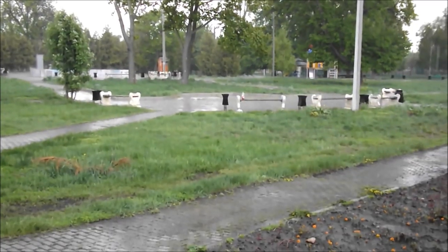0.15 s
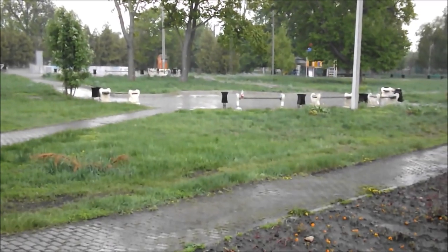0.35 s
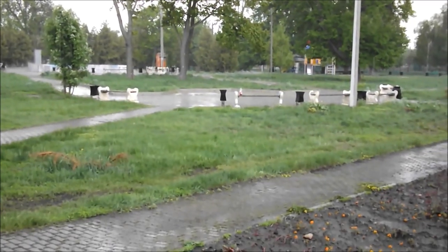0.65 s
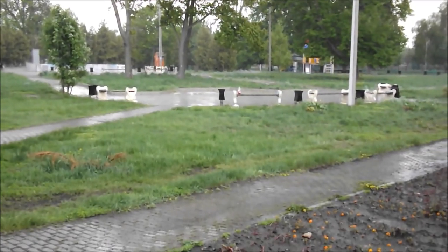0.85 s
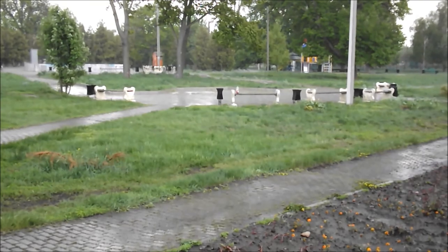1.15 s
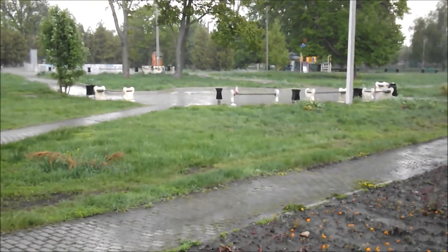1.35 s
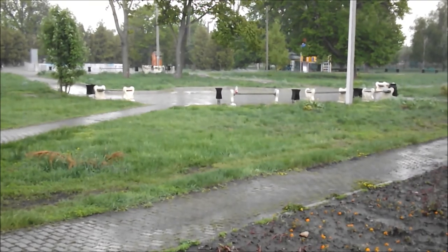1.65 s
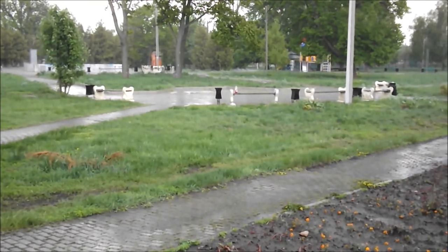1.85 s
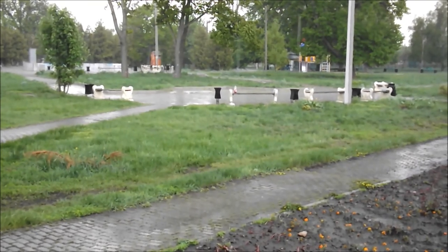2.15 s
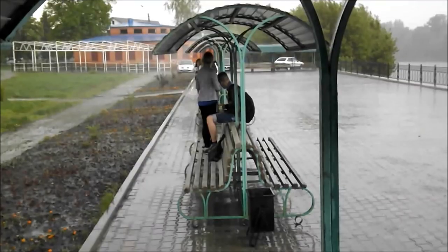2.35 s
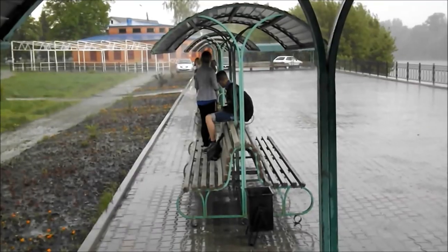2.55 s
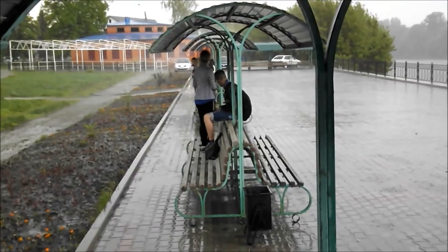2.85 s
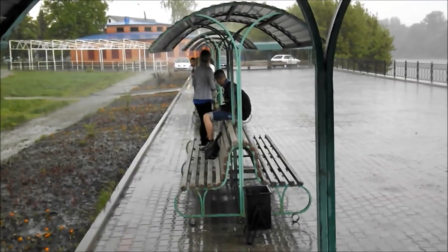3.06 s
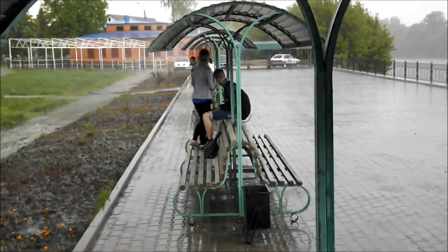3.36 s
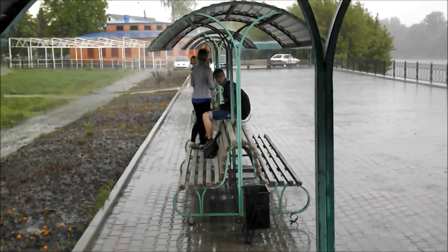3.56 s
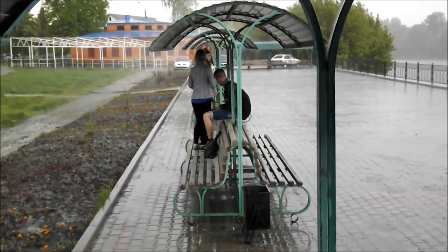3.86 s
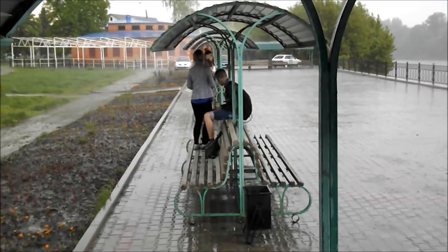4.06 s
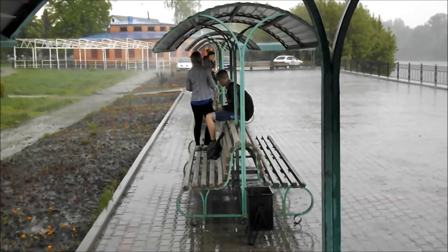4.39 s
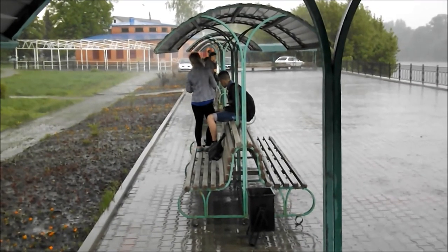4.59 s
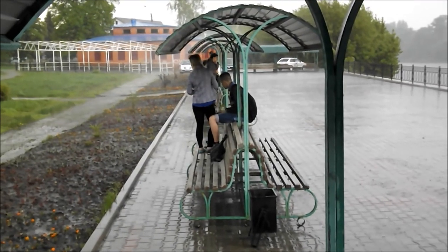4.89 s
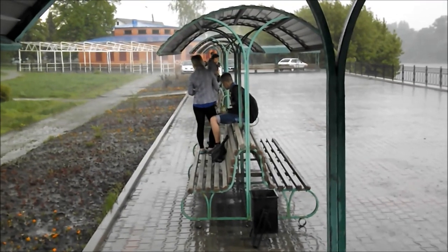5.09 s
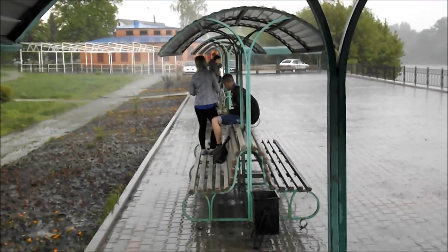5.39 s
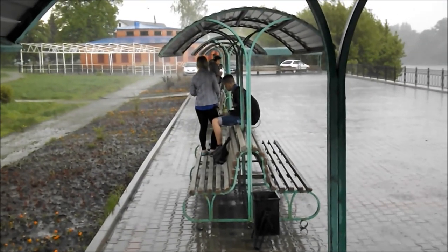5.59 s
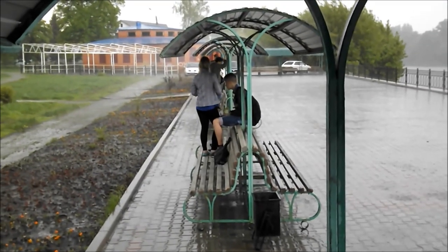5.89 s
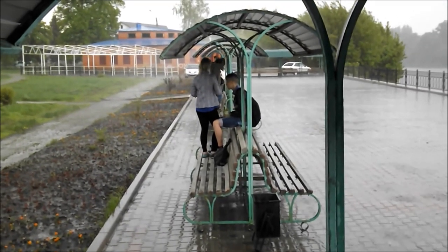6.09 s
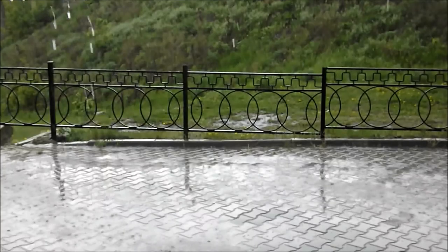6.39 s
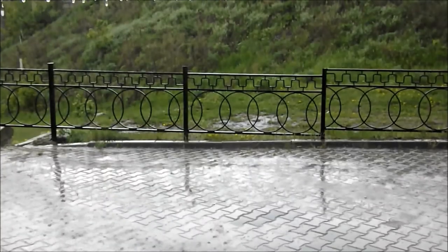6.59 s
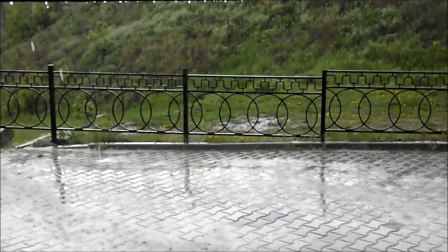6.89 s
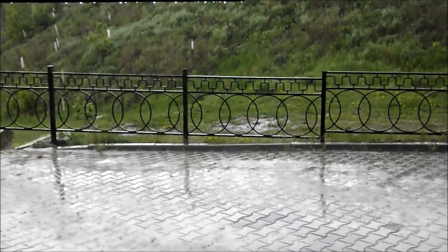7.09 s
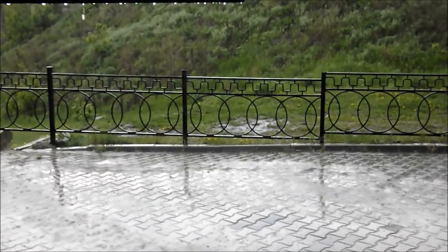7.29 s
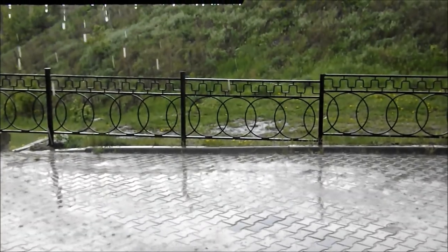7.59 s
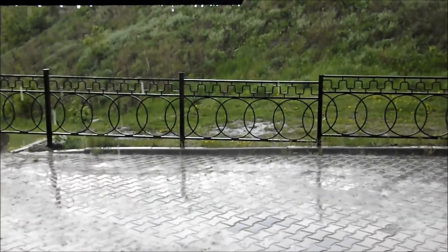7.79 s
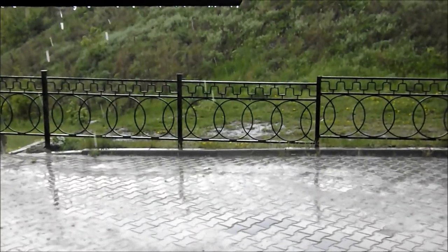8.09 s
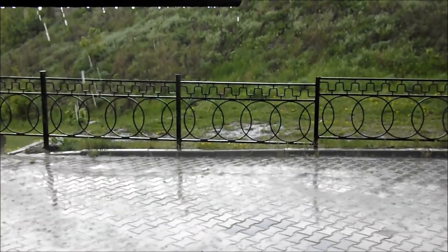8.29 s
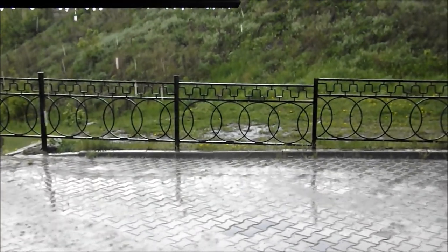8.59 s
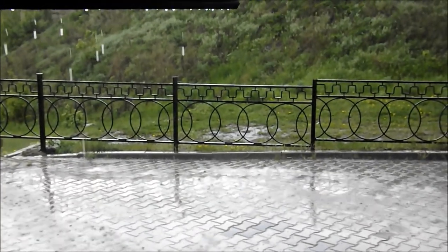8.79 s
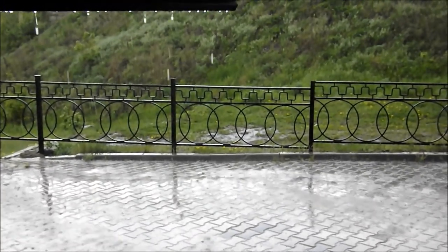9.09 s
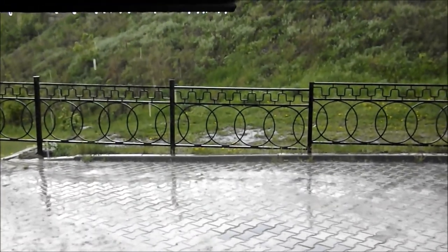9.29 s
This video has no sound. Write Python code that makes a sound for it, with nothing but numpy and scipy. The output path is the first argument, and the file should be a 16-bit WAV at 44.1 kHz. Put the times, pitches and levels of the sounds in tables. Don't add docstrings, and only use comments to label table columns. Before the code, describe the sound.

Heavy rain fills the whole stretch, a dense, midrange rushing patter on a shelter roof and wet paving, with faint fine spray and a steady, low distant storm rumble. From 0 to 2.3 seconds it is out of the wind, with roof smacks and a few crisp close drops; the top end sounds slightly patchy. A click and tiny gap at 2.34 cut to a breezier spot, where low wind thumps and flutters hit the microphone, and sharp drops snap near 2.6 and 3.3. The rain swells and eases slightly. At 6.34 it cuts to nearly 0.2 seconds of silence, then resumes at 6.5 over open paving, a little brighter, with quicker, more frequent wind buffets until about 9.3. Close, essentially mono small-camera sound throughout, its automatic level ducking after impacts and creeping back.

```python
import sys
import numpy as np
from scipy import signal
from scipy.fft import rfft, irfft
from scipy.io import wavfile
from scipy.ndimage import uniform_filter1d, map_coordinates

SR = 44100
rng = np.random.default_rng(int(sys.argv[2]) if len(sys.argv) > 2 else 0)


def invert_db(level):
    return 10 ** (np.asarray(level, dtype=float) / 20)


def dump(signal):
    limited = np.clip(np.atleast_2d(signal).T, -1, 1)
    pcm = np.round(limited * 32767).astype(np.int16)
    wavfile.write(sys.argv[1], SR, pcm)


N = 416744

# (frequency [Hz], density [dB per Hz])
RUMBLE_SPECTRUM = [(15, -29.5), (30, -0.5), (60, 2), (100, -1.5), (200, -3), (350, -7.5), (500, -19)]
# (frequency [Hz], density [dB per Hz])
HISS_SPECTRUM = [(7000, -28), (11000, 3.5), (17000, 2.5)]
# (frequency [Hz], density [dB per Hz])
BUFFET_SPECTRUM = [(6, -6.5), (15, 0.5), (25, 2.5), (45, -1.5), (80, -13), (130, -22), (250, -46.5)]
# (frequency [Hz], density [dB per Hz])
FLUTTER_SPECTRUM = [(40, -16.5), (70, 3), (130, -1), (220, -5), (330, -15), (500, -44.5)]
# (frequency [Hz], density [dB per Hz])
RASP_SPECTRUM = [(120, -23.5), (250, 1.5), (450, -3), (650, -6.5), (900, -23)]
# (start [s], length [s], buffet [dB], flutter [dB])
GUSTS_ON_MIC = [(2.69, 0.12, -23.5, -24.5), (2.909, 0.052, -15.5, -21.5), (3.051, 0.059, -12, -13),
                (3.25, 0.15, -24.5, -25), (3.65, 0.064, -25, -14), (3.70, 0.13, -14.5, -25.5),
                (3.932, .24, -20.5, -44.5), (4.19, 0.13, -30, -26), (4.512, .25, -20.5, -33),
                (4.80, .18, -15.5, -20.5), (5.146, 0.14, -19.5, -37), (5.38, 0.23, -15, -32.5),
                (5.68, .14, -16, -25), (5.844, 0.058, -17, -13), (5.922, 0.14, -15.5, -32),
                (6.102, .25, -21, -11), (6.52, .2, -19, -20.5), (6.806, 0.047, -14.5, -12),
                (6.91, .05, -27, -11), (7.226, .1, -15.5, -18), (7.387, 0.062, -21, -14.5),
                (7.57, 0.16, -18.5, -19), (7.812, .2, -14, -14.5), (8.096, 0.067, -22, -14.5),
                (8.22, 0.12, -18, -20), (8.4, 0.19, -15.5, -27), (8.66, 0.13, -14.5, -35),
                (8.855, 0.12, -15.5, -27.5), (9.05, .07, -21, -38), (9.2, .12, -25.5, -45)]
# (time [s], duck depth [dB])
HEAVY_SMACKS = [(.1, 5), (.718, 4), (1.247, 3), (1.352, 4.5), (1.433, 4.5), (1.541, 5.5), (1.821, 3),
                (2.065, 2.5), (2.224, 3.5), (2.305, 5), (2.564, 6), (2.928, 6.5), (3.349, 4), (3.402, 3),
                (3.642, 5), (3.702, 4.5), (4.4, 8), (4.539, 7), (4.869, 5.5), (5.742, 3.5), (5.883, 6.5),
                (6.111, 5), (6.69, 2.5), (6.984, 0.5), (7.224, 4), (8.59, 0.5), (8.711, 2), (8.8, 4),
                (8.976, 2.5), (9.089, 1.5)]
# (time [s], peak [dB], duck depth [dB])
CLOSE_DROPS = [(.4948, -41, 3.5), (1.0301, -35, 3.5), (1.5997, -41, 6.5), (2.4312, -33, 2), (2.631, -24, 3),
               (2.7131, -38, 3.5), (3.0662, -33, 1.5), (3.1002, -37, 2.5), (3.2793, -34, 3),
               (3.303, -21, -3), (3.461, -38, 2.5), (3.5062, -31, 4), (3.5818, -36, 3), (4.035, -33, -0.5),
               (4.274, -34, 3), (4.6641, -36, 6), (4.7724, -30, 7), (4.9047, -34, 1.5), (5.0678, -35, 2),
               (5.5745, -34, 0.5), (6.1318, -36, 0.5), (6.7888, -32, 3), (7.3172, -37, 3),
               (7.4263, -35, 6.5), (7.6618, -33, 5), (7.8673, -38, 5), (8.009, -32, 0.5), (8.128, -40, 1.5),
               (9.1674, -29, 0.5), (9.2494, -32, 2.5)]
# (frequency [Hz], density [dB per Hz])
TICK_SPECTRUM = [(4000, -24.5), (8000, 8), (12000, -7), (17000, -9)]
# (time [s], patter level [dB])
RAIN_LEVEL = [(0, -17), (.5, -16), (1.5, -15.5), (2, -17), (2.36, -15.5), (2.9, -18), (3.6, -16.5),
              (4, -19), (4.4, -16), (4.8, -17.5), (5.2, -16.5), (5.6, -20), (6, -16.5), (6.53, -21),
              (7, -16.5), (7.5, -18), (8.8, -17.5), (9.45, -15)]
# (frequency [Hz], density [dB per Hz])
PATTER_SPECTRUM = [(180, -41), (300, -11), (600, -6.5), (700, -4), (770, -10), (1000, -10), (1500, -6),
                   (2000, -1.5), (3700, -2), (4300, -10), (5000, -17.5), (7000, -26), (8000, -37.5),
                   (12000, -52.5)]
# (frequency [Hz], density [dB per Hz])
SPRAY_SPECTRUM = [(5000, -18), (7500, 1.5), (10500, -5.5), (11500, -11), (15700, -16.5), (17000, -20)]
OPEN_PAVING = [(300, -2), (1000, -0.5), (2000, -1), (3000, 1.3), (6000, -1), (16000, -2)]
# (spray under the patter [dB], breeze buffet [dB], breeze flutter [dB], faint drops peak [dB])
PLACES = [
    (-32.5, -85, -86, -46),
    (-31.5, -29.5, -43, -42),
    (-33, -26, -31.5, -44.5),
]
# (frequency [Hz], width [Hz], lift [dB])
CAVITIES = [(2280, 400, 2.5), (3870, 190, 1), (4610, 230, 2), (6320, 640, 6), (9500, 1300, 3)]
LOST_SHARE = [(300, 0, 1), (1250, 0, .75), (1600, 0, 0), (8500, 0, 0), (10300, .05, .06), (11500, .38, .28),
              (14500, .6, .42), (15300, .92, .88)]
# (start [s], end [s], leftover sound [dB], leftover lasts [s])
CUT_GAPS = [
    (2.3438, 2.3522, -22, .0084),
    (6.3438, 6.5238, -35, .028),
]

GUST_RISE_DB_PER_S, GUST_FALL_DB_PER_S = 450, 449
EDDY_SPEEDUP = 1.53
LAST_TAKE_RASP_DB = -5
SPATTER_DB = -22
FAINT_PER_S, FAINT_SCATTER_DB = 5, 1
DUCK_LAG_S = .012
CREEP_S, CREEP_DB = .08, 1
THINNING = .5
CUT_SWING = .6
LEFTOVER_FADE_DB_PER_S = 250


def unit(x):
    return x / np.sqrt(np.mean(x ** 2) + 1e-20)


def even(x, span_s):
    power = np.abs(uniform_filter1d(x ** 2, int(span_s * SR)))
    return unit(x / np.sqrt(power + .1))


def curves(rows):
    s, *columns = np.transpose(rows)
    return [np.interp(np.arange(N) / SR, s, column) for column in columns]


def per_take(column):
    starts = [start for start, *_ in CUT_GAPS]
    return np.take(column, np.searchsorted(starts, np.arange(N) / SR))


def wobble(rate):
    knots = rng.standard_normal(int(N * rate / SR) + 4)
    return map_coordinates(knots, [np.arange(N) * rate / SR])


def colour(x, spectrum, size=8192):
    hz, db = np.transpose(spectrum)
    bins = np.log(np.fft.rfftfreq(size, 1 / SR) + 1)
    log_gain = np.log(invert_db(np.interp(bins, np.log(hz), db, right=-120)))
    fold = np.r_[1, 2 * np.ones(size // 2 - 1), np.zeros(size // 2)]
    pulse = irfft(np.exp(rfft(irfft(log_gain) * fold)))
    return signal.fftconvolve(x, pulse / np.linalg.norm(pulse))[:N]


def preamp():
    return invert_db(-64) * colour(rng.standard_normal(N), HISS_SPECTRUM)


def storm():
    return invert_db(-30.0 + 1.2 * wobble(3)) * colour(rng.standard_normal(N), RUMBLE_SPECTRUM)


def gusts():
    t = np.arange(0, N, 32) / SR
    s, length, *db = np.transpose(GUSTS_ON_MIC)[..., None]
    rise_db = GUST_RISE_DB_PER_S * (t - s)
    fall_db = GUST_FALL_DB_PER_S * (s + length - t)
    shape_db = np.minimum(0, np.minimum(rise_db, fall_db))
    power = invert_db(2 * (np.array(db) + np.maximum(shape_db, -120))).sum(axis=1)
    breeze = invert_db(2 * np.array([per_take(c) for c in np.transpose(PLACES)[1:3]]))
    return 10 * np.log10(breeze + np.repeat(power, 32, axis=1)[:, :N])


def wind():
    buffet_db, flutter_db = gusts()
    quick_spectrum = [(hz * EDDY_SPEEDUP, db) for hz, db in BUFFET_SPECTRUM]
    slow = even(colour(rng.standard_normal(N), BUFFET_SPECTRUM), span_s=.08)
    quick = even(colour(rng.standard_normal(N), quick_spectrum), span_s=.08)
    buffet = np.where(per_take([0, 0, 1]), quick, slow)
    flutter = even(colour(rng.standard_normal(N), FLUTTER_SPECTRUM), span_s=.04)
    flutter = unit(invert_db(1.6 * wobble(30)) * flutter)
    rasp = even(colour(rng.standard_normal(N), RASP_SPECTRUM), span_s=.04)
    rasp = unit(invert_db(3.3 * wobble(40)) * rasp)
    hardness_db = uniform_filter1d(flutter_db, SR // 8) + 14
    rasp_db = -26.5 + 2.4 * hardness_db + per_take([0, 0, LAST_TAKE_RASP_DB])
    return invert_db(buffet_db - 1.5) * buffet + invert_db(flutter_db - 6) * flutter + invert_db(rasp_db) * rasp


def ducks():
    hits = sorted(HEAVY_SMACKS + [(s + DUCK_LAG_S, depth_db) for s, _, depth_db in CLOSE_DROPS])
    edges = [0] + [s for s, _ in hits] + [N / SR]
    creep = []
    for a, b in zip(edges, edges[1:]):
        steps = max(round((b - a) / CREEP_S), 1)
        creep.extend(np.linspace(a, b, steps + 1)[1:-1])
    return hits + [(s, CREEP_DB) for s in creep]


def smacks():
    s, depth_db = np.transpose(ducks())
    size = invert_db(-3.0 + 0.51 * depth_db) * rng.choice([-1, 1], len(s))
    at = np.round((s - .006) * SR).astype(int)
    return colour(np.bincount(at, size, N), PATTER_SPECTRUM)


def splashes():
    snap, body = np.zeros(N + SR), np.zeros(N + SR)
    t = np.arange(SR // 40) / SR
    at = rng.integers(N, size=int(FAINT_PER_S * N / SR))
    faint_db = per_take(np.transpose(PLACES)[3])[at] + FAINT_SCATTER_DB * rng.standard_normal(len(at))
    for s, db in [row[:2] for row in CLOSE_DROPS] + list(zip(at / SR, faint_db)):
        burst = rng.standard_normal((2, len(t)))
        start = round(s * SR)
        snap[start:][:len(t)] += invert_db(db - 1.5 - 60 * t / .006) * burst[0]
        body[start:][:len(t)] += invert_db(SPATTER_DB - 60 * t / .022) * burst[1]
    return colour(snap, TICK_SPECTRUM) + colour(body, PATTER_SPECTRUM)


def drops(per_second, spread_db, far_db):
    hit = rng.random(N) < per_second / SR
    size_db = spread_db * np.minimum(rng.exponential(size=N), 5)
    near = hit * invert_db(size_db) * rng.choice([-1, 1], N)
    return unit(unit(near) + invert_db(far_db) * rng.standard_normal(N))


def rain():
    rain_db, = curves(RAIN_LEVEL)
    spray_db = per_take(np.transpose(PLACES)[0])
    sheets_db = 0.8 * wobble(30)
    patter = colour(drops(6000, spread_db=3.5, far_db=3), PATTER_SPECTRUM)
    paving = unit(colour(patter, [(1, 0)] + OPEN_PAVING + [(SR, 0)]))
    patter = np.where(per_take([0, 0, 1]), paving, patter)
    spray = colour(drops(1500, spread_db=4, far_db=1.0), SPRAY_SPECTRUM)
    patter_db = rain_db + 0.15 + sheets_db
    spray_db = rain_db + spray_db + 1.0 + sheets_db + 0.72 * wobble(20)
    return invert_db(patter_db) * patter + invert_db(spray_db) * spray


def housing(x):
    for hz, width_hz, lift_db in CAVITIES:
        x = x + (invert_db(lift_db) - 1) * signal.lfilter(*signal.iirpeak(hz, hz / width_hz, SR), x)
    return x


def scene():
    water = housing(rain() + splashes() + smacks())
    return np.tile(water + storm() + wind() + preamp(), (2, 1))


def gain_control(grip_s, release_s):
    s, depth_db = np.transpose(ducks())
    kicks = np.bincount(np.round(s * SR).astype(int), depth_db, N)[:N]
    duck_db = -signal.lfilter([1], [1, -np.exp(-1 / (release_s * SR))], kicks)
    duck_db = uniform_filter1d(duck_db, int(grip_s * SR))
    return invert_db(duck_db - uniform_filter1d(duck_db, SR // 2))


def lose_patches(x, count=16):
    hz, t, z = signal.stft([x[0] + x[1], x[0] - x[1]], SR, nperseg=2048)
    f, *lost = np.transpose(LOST_SHARE)
    share = np.array([np.interp(hz, f, column) for column in lost])[..., None]
    patches = np.repeat(rng.random((2, len(hz), len(t))), count, axis=1)[:, :len(hz)]
    lines = np.repeat(rng.random(z.shape), 3, axis=1)[:, :len(hz)]
    treble = (hz > f[3])[:, None]
    keep = (patches > share) & (lines > THINNING * share * treble)
    both, apart = signal.istft(z * keep, SR, nperseg=2048)[1][:, :x.shape[1]]
    return np.array([both + apart, both - apart]) / 2


def cut(x):
    t = np.arange(N) / SR
    for start, end, left_db, lasts in CUT_GAPS:
        fade_db = left_db - LEFTOVER_FADE_DB_PER_S * np.clip(t - start, 0, lasts)
        leftover = invert_db(fade_db) * (t < start + lasts)
        x = x * np.where((t > start) & (t < end), leftover, 1)
    return x


def band_limit(x):
    return signal.sosfilt(signal.butter(12, 15740, fs=SR, output="sos"), x)


def record(dry):
    x = dry * gain_control(grip_s=0.011, release_s=0.24)
    x = x / (1 + np.abs(x / .98) ** 6) ** (1 / 6)
    first = round(CUT_GAPS[0][0] * SR)
    x[0, 1:first] = x[1, :first - 1]
    x[:, :first] = lose_patches(x[:, :first])
    x[:, first - 8:first] += CUT_SWING * np.hanning(16)[:8]
    return band_limit(cut(x))


dry = scene()
out = record(dry)
dump(out)
```